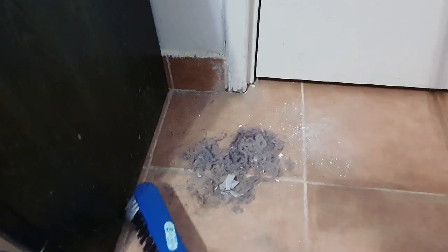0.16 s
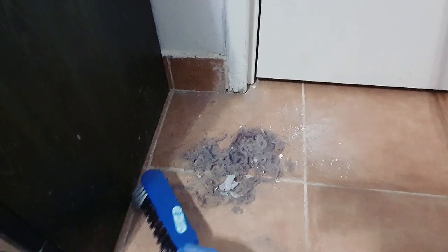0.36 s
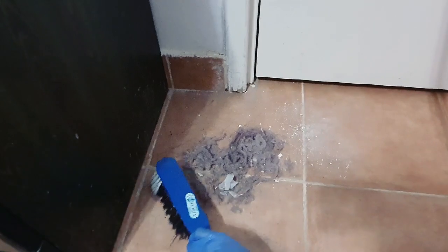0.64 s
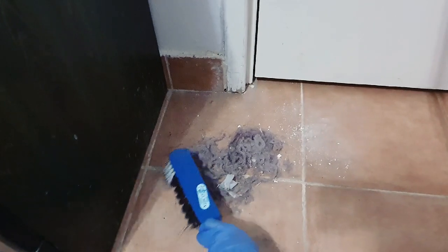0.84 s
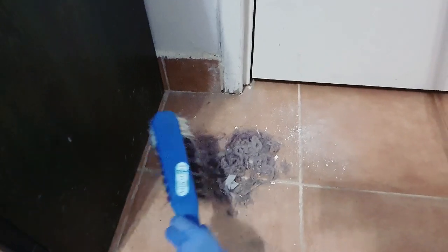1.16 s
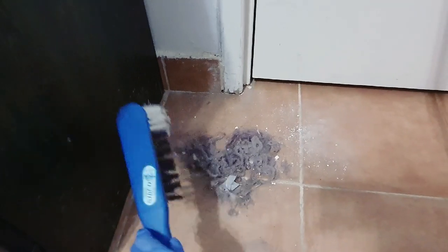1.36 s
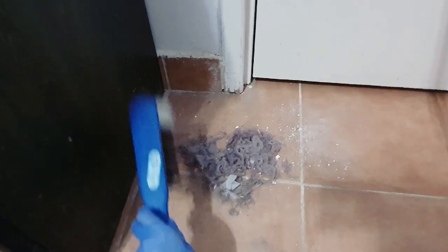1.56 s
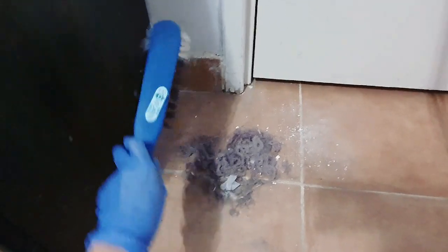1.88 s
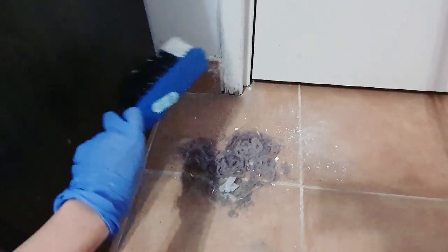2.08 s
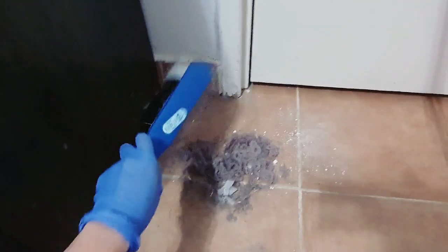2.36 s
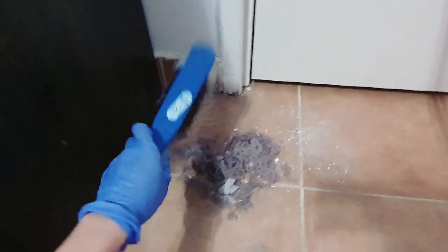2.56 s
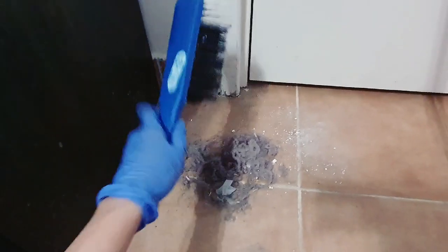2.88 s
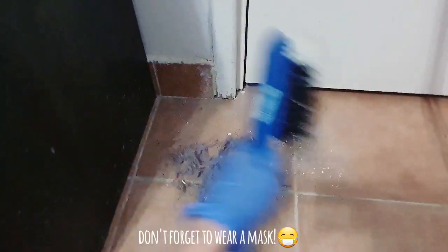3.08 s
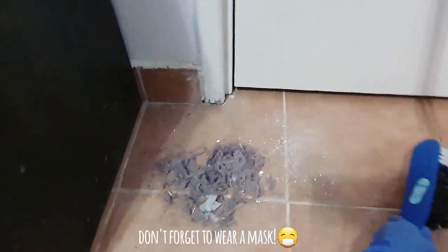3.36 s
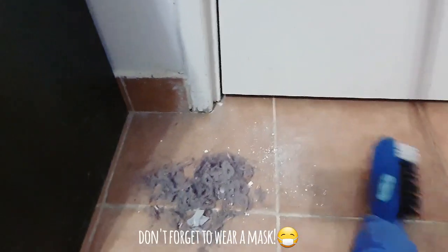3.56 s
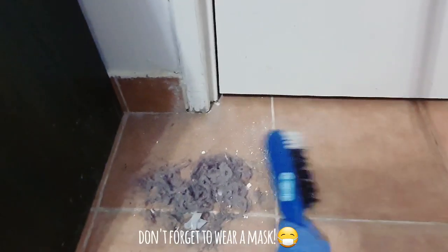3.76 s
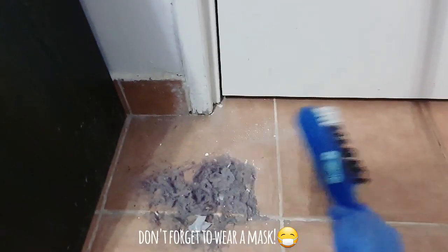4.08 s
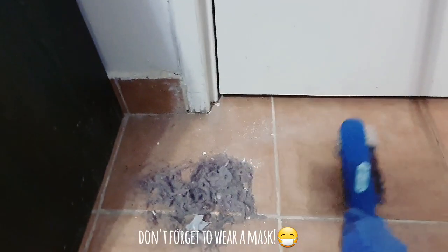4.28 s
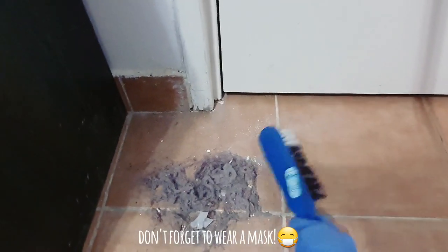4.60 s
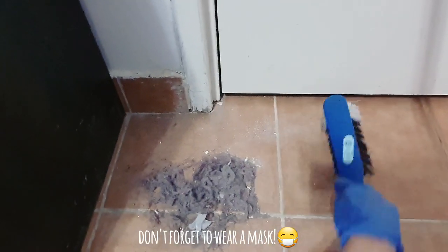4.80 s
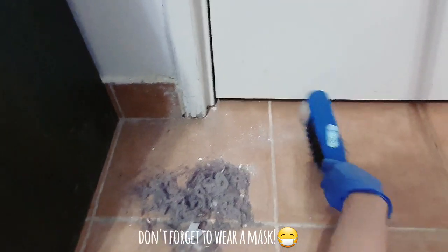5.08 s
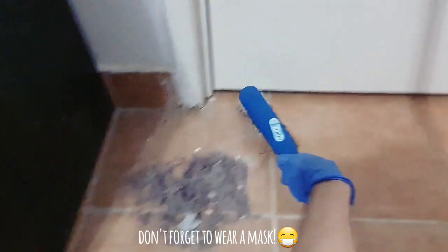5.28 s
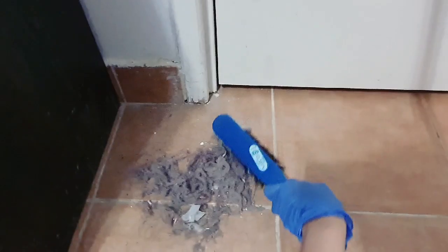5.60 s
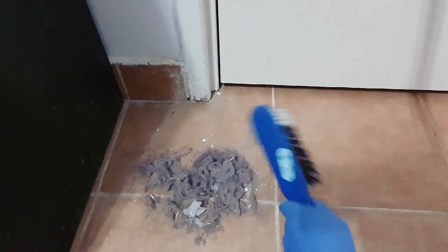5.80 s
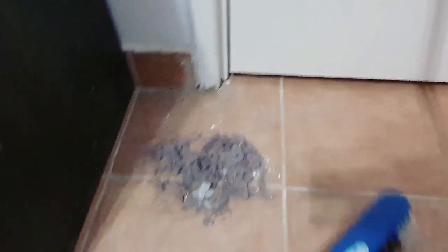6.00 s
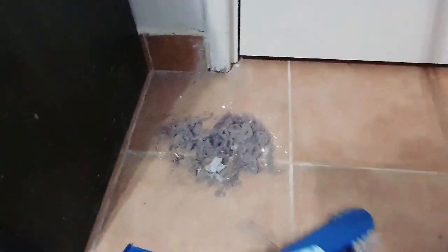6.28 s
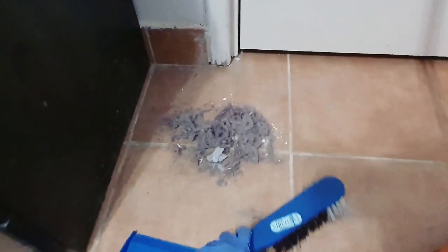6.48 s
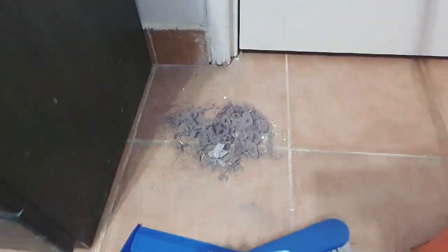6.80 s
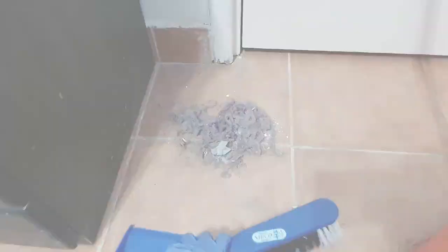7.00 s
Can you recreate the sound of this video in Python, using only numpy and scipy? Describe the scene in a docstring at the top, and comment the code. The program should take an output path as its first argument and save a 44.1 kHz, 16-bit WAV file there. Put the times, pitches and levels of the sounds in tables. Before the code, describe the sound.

Close-up floor sweeping indoors: gentle bristle rustles first, then slapping landings, plastic knocks and strong dry scrapes on tile, with occasional grit ticks. A final brush stroke gives way to a plastic dustpan rattling, scraping and ringing dully. Beneath it all, a motor's low rumble swells and sinks with airy hiss. The small hard room adds brief reflections.

```python
"""An appliance hums and hisses throughout in a small tiled room, its rumble swelling and sinking.
From the start a stiff hand brush sweeps dust over floor tiles: clouds of stick-slip clicks make its strokes
and dabs, bristles land as short crunches, and its knocks are damped modes struck by a firm contact and a
brief chatter. After a long sweep and a last stroke, a plastic dustpan bumps and scrapes into place, its tray
ringing. Bits of grit tick, plastic rubs as resonant noise, and close echoes and a short tail place it all."""
import sys
import numpy as np
from scipy import signal
from scipy.fft import rfft, irfft
from scipy.io import wavfile
from scipy.ndimage import uniform_filter1d

SR = 44100
rng = np.random.default_rng(int(sys.argv[2]) if len(sys.argv) > 2 else 0)


def waveform_to_disk(signal):
    """Save audio, clipped to [-1, 1], as 16-bit WAV at the path in sys.argv[1]."""
    frames = np.transpose(np.atleast_2d(signal))
    scaled = np.clip(frames, -1, 1) * 32767
    samples = np.round(scaled).astype(np.int16)
    wavfile.write(sys.argv[1], SR, samples)


N = 315182
T = np.arange(N) / SR  # s
HZ = np.fft.rfftfreq(N, 1 / SR)
EDGE_HZ = 14600  # upper band limit
EASE_DB_PER_S = 30  # the hand bears down as a stroke begins, then eases off

# Levels in the tables are taken before the trims in the functions and before the room.
# short brush strokes: start_s, attack_s, hold_s, release_s (per 20 dB), drag_db, swell_db (over the hold),
# tips_db (fizz against the drag), press_db (pressure against the drag)
STROKES = [(-0.05, .03, .37, .25, -75, -1, -6.5, -2), (0.42, .08, .13, .085, -75.5, 10.5, -8, -14),
           (1.19, .03, 1.25, .1, -84.5, -1.5, -9.5, -10), (2.54, .05, .06, .17, -65, 0, -9, -12),
           (3.19, .16, .25, .088, -55, 2.2, -4.3, 0), (4.03, .13, .12, .085, -56.3, -2.5, -4, -6),
           (5.85, .11, .15, .2, -63, .7, -9, 5.5)]
# one long sweep along the door: time_s, drag_db, fizz_db
LONG_SWEEP = [(4.745, -71, -76), (4.855, -56, -61), (4.947, -60, -61), (5.039, -65, -67), (5.205, -66, -68),
              (5.329, -63, -67), (5.471, -71, -80), (5.557, -76, -78), (5.62, -83, -88)]
# dabs of the bristles, and the brushing tail after a landing:
# peak_s, drag_db, rise_s (per 20 dB), fall_s (per 20 dB)
DABS = [(1.235, -75.5, .04, .2), (1.41, -83, .1, .15), (1.535, -81, .05, .15), (1.71, -76, .1, .19),
        (2.005, -78, .09, .04), (2.068, -74, .06, .11), (2.195, -75.5, .04, .22), (2.437, -75, .05, .12),
        (3.19, -58, .095, .13), (3.96, -73, .17, .16), (4.66, -60, .05, .18), (5.735, -67.5, .2, .14),
        (5.83, -67, .08, .15)]
# friction colour of the bristles: freq_hz, density_db (per Hz)
BRISTLE_COLOUR = [(100, -59), (300, -23.5), (800, -9.5), (1500, -4.5), (2400, -0.5), (3600, 1), (5000, 0),
                  (6500, -1.5), (8400, -3.5), (10000, -10.5), (14500, -24.5)]
# fizz of the bristle tips, also of dust under the pan: freq_hz, density_db (per Hz)
TIP_COLOUR = [(3000, -48), (7000, -16), (8800, -6), (10500, -5.5), (12300, -5.5), (14500, -9.5)]
# ringing of lightly touched tufts: freq_hz, width_hz, level_db
TUFT_MODES = [(4020, 420, 0), (4550, 500, -2.5), (8500, 990, -4)]
# ringing of the plastic brush back: freq_hz, width_hz, level_db
BRUSH_MODES = [(560, 154, 1), (925, 90, -0.5), (1185, 143, 1.5), (1394, 70, 2), (1573, 87, 1),
               (2000, 120, -0.5), (2300, 90, 0.5), (2776, 210, 1), (3452, 120, -4), (3660, 190, -4.5),
               (4320, 140, -2.5), (4750, 300, -9.5)]
# bristles slapping down: start_s, level_db, rise_s, fall_s, tips_db (fizz against the crunch)
LANDINGS = [(2.582, -52.5, 0.0075, 0.012, -9), (3.159, -44, 0.015, 0.017, -6),
            (4.041, -50, 0.0052, 0.02, -9), (4.632, -49.5, .003, 0.03, -13), (5.871, -58, .002, .012, -20)]
# knocks of the brush on tile, tufts twanging or the plastic back ringing:
# start_s, level_db, centre_hz, spread_octaves, chatter_s
KNOCKS = [(1.222, -69, 4200, .25, .012), (2.589, -52.5, 4100, 0.25, 0.012), (3.168, -45, 3600, 1.6, 0.012),
          (4.0435, -40.5, 1750, 1.1, 0.006), (4.633, -43, 2800, 0.53, 0.0057),
          (5.869, -47.5, 2700, 0.35, 0.006), (5.898, -52.5, 1400, 1.8, .005)]
# dustpan sliding into place: time_s, scrape_db (its lip), tray_db (its ring), dust_db (fizz underneath)
SLIDE = [(6.38, -92, -86, -110), (6.46, -68, -68, -100), (6.64, -66.5, -66, -100),
         (6.73, -56.5, -61.5, -73), (6.8, -61.5, -64, -84), (6.88, -66, -67, -85), (6.97, -65, -69, -80),
         (7.1, -71, -82, -100)]
# friction colour of the dustpan lip: freq_hz, density_db (per Hz)
SCRAPE_COLOUR = [(400, -31), (1500, -4), (2800, 7), (4000, -5), (5200, -1.5), (6500, -5.5), (8500, -4.5),
                 (10000, -10), (12000, -11.5), (14500, -28)]
# ringing of the dustpan: freq_hz, width_hz, level_db
PAN_MODES = [(402, 120, 0), (790, 180, -3.5), (1070, 190, -1.5), (1660, 120, 1.5), (2280, 91, 0),
             (2850, 210, -2.5), (3850, 750, -10)]
# dustpan bumps: start_s, level_db, centre_hz, spread_octaves, chatter_s
BUMPS = [(6.437, -60, 2200, 1.5, .004), (6.467, -54, 1400, 0.8, .01), (6.514, -58, 1600, 1, 0.012),
         (6.547, -50, 1700, .9, 0.018), (6.595, -56, 2200, 0.49, .004), (6.682, -57, 3520, 0.9, .004),
         (6.728, -53, 2850, 1.4, .012), (6.755, -48.5, 397, 0.45, 0.012), (6.802, -54.5, 2200, 0.85, 0.005)]
# plastic rubbing on tile, dull scuffs to faint squeaks: start_s, length_s, centre_hz,
# width_hz (of the resonance before it is squared), level_db
RUBS = [(0.199, .28, 1370, 900, -68.5), (5.24, 0.1, 2850, 400, -63), (5.843, 0.031, 2730, 200, -60),
        (6.388, 0.075, 1080, 700, -66)]
# grit ticking under the bristles and the dustpan: start_s, level_db
GRIT = [(2.723, -62), (5.743, -63), (5.7695, -48), (6.659, -58), (7.044, -62), (7.055, -59)]
# deep rumble of the appliance: freq_hz, density_db (per Hz)
RUMBLE_COLOUR = [(20, -22), (38, -14), (50, -3), (60, 0), (76, 4), (84, 15), (90, 10), (98, 2.5),
                 (110, -14), (160, -49.5), (400, -120)]
# swell of the rumble: time_s, level_db
RUMBLE_SWELL = [(0, -48.5), (.35, -43.5), (.9, -49), (1.7, -45), (2.7, -45), (3.4, -41.5), (4.5, -43.5),
                (5.4, -41), (6.1, -42.5), (6.7, -52), (7.15, -55)]
# rushing air of the appliance: freq_hz, density_db (per Hz)
RUSH_COLOUR = [(20, -34), (70, -22), (105, 8), (125, 11), (170, 8.5), (220, 0.5), (320, 0), (430, -3.5),
               (540, -9), (680, -13), (850, -25), (1500, -59), (4000, -100)]
# hiss of its pipes: freq_hz, density_db (per Hz)
HISS_COLOUR = [(500, -21), (850, -5.5), (1150, 0.5), (1420, -4), (1780, 0), (2050, -5), (2450, 0.5),
               (2900, -5), (3300, -15), (4500, -21.5), (9000, -25), (14500, -32)]
# fuzzy whistles of its pipes: centre_hz, width_hz (of the resonance before it is squared), level_db
WHISTLES = [(1765, 170, -84.5), (2760, 105, -75.5)]
# tones of its motor: pitch_hz, level_db, unsteadiness (0-1)
MOTOR_TONES = [(58.2, -56, 0.35), (70.86, -46.5, 0.39), (361.2, -64.5, 0.13), (494.5, -79, 0.7),
               (605, -85, 1)]
# first echoes from floor, door, wall and cabinet: left_delay_s, right_delay_s
ECHOES = [(.00083, .00088), (.0019, .0022), (.0037, .0033), (.0058, .0064)]
# decay of the room: freq_hz, t60_s
ROOM_DECAY = [(250, 0.38), (1000, 0.43), (4000, 0.14), (8000, 0.21), (14000, 0.1)]
# left-right likeness of the sounds: freq_hz, likeness (0-1)
LIKENESS = [(30, 0.93), (125, 0.95), (250, 0.98), (500, 0.43), (1000, 0.18), (2500, 0.17), (5000, 0.12),
            (14000, 0.092)]
# stereo balance: freq_hz, left_over_right_db
LEAN = [(60, -1.5), (250, -0.7), (500, -0.9), (1000, -3.8), (2000, -3.5), (4000, -2.5), (8000, -1.1),
        (12000, 1.2)]


def sweeping(press_db=-4.0, fizz_db=3.5, catch_db=-0.7, tuft_db=-9.5, damped_db=-65.0):
    """Thousands of bristles catch and flick on the tile; pressure from the hand shakes the brush back."""
    moves = [stroke(*row) for row in STROKES] + [dab(*row) for row in DABS] + [long_sweep()]
    drag, fizz, press = np.sqrt(sum(move ** 2 for move in moves))
    twang = np.minimum(drag, amp(damped_db)) * amp(tuft_db)  # a firm stroke damps the tufts
    flicks = slips(7000, 1.7) * amp(catch_db * wander(60))  # whole tufts catch together
    bristles = drag * colour(flicks, amp(read(BRISTLE_COLOUR, HZ)))
    tufts = twang * colour(slips(1500, 2.5), body(TUFT_MODES, HZ))
    back = amp(press_db) * press * colour(slips(3000, 1.6), body(BRUSH_MODES, HZ))
    tips = amp(fizz_db) * fizz * colour(slips(9000, 1.6), amp(read(TIP_COLOUR, HZ)))
    return bristles + tufts + back + tips


def stroke(start, attack, hold, release, db, swell_db, tips_db, press_db):
    """The brush gathers speed, is drawn along and lifts off: gains of drag, fizz and pressure."""
    t = T - start - attack
    onset = np.clip(1 + t / attack, 0, 1)
    swell = swell_db * np.clip(t / hold, 0, 1)
    lift = 20 * np.maximum(t - hold, 0) / release
    drag = onset * amp(db + swell - lift)
    return np.array([drag, drag * amp(tips_db), drag * amp(press_db) * bearing(start)])


def long_sweep(drag_db=4., tips_db=2.5, press_db=6.5):
    """A hard push that trails off along the door: gains of drag, fizz and pressure."""
    s, db, fizz_db = np.transpose(LONG_SWEEP)
    drag = level(s, db + drag_db)
    return np.array([drag, level(s, fizz_db + tips_db), drag * amp(press_db) * bearing(s[0])])


def dab(s, db, rise, fall, tips_db=-14.5, press_db=-3.):
    """The bristles brush against the tile and fade: gains of drag, fizz and pressure."""
    drag = amp(db - 20 * np.maximum((s - T) / rise, (T - s) / fall))
    return np.array([drag, drag * amp(tips_db), drag * amp(press_db)])


def bearing(start):
    """The share of the hand's pressure that is left as a stroke goes on."""
    return amp(-EASE_DB_PER_S * np.maximum(T - start, 0))


def landings():
    """Rows of bristles meet the floor within a few milliseconds: a short crunch."""
    crunch, fizz = np.zeros((2, N))
    for s, db, rise, fall, tips_db in LANDINGS:
        onset = np.clip((T - s) / rise, 0, 1)
        gain = amp(db) * onset * np.exp(-np.maximum(T - s - rise, 0) / fall)
        crunch += gain
        fizz += gain * amp(tips_db)
    bristles = colour(slips(10000, 0.67), amp(read(BRISTLE_COLOUR, HZ)))
    tips = colour(slips(12000, 1.8), amp(read(TIP_COLOUR, HZ)))
    return crunch * bristles + fizz * tips


def blows(rows, modes, rattle=.12, size=4096):
    """Each blow is one firm contact and a brief chatter that ring the modes in a band around its centre."""
    out, t, hz = np.zeros((2, N)), np.arange(size) / SR, np.fft.rfftfreq(size, 1 / SR)
    for s, db, centre_hz, octaves, chatter in rows:
        force = rattle * rng.standard_normal((2, size)) * np.exp(-t / chatter)
        force[0] += np.arange(size) == SR // 1000  # the firm contact, 1 ms in
        band = 1 / (1 + 1j * (hz / centre_hz - centre_hz / (hz + 1)) / octaves)
        ring = colour(force, body(modes, hz) * band)
        loudest = uniform_filter1d((ring ** 2).mean(0), size=256).max()  # power over about 6 ms
        add(out, s, amp(db) * ring / np.sqrt(loudest))
    return out


def sliding(tray_db=-1.5, judder_db=2.):
    """The lip of the dustpan judders over the dusty tile and rings its tray."""
    s, *levels_db = np.transpose(SLIDE)
    scrape, tray, dust = (amp(np.interp(T, s, db, left=-140)) for db in levels_db)
    grains = slips(4000, 2.8) * amp(judder_db * wander(70))
    lip = scrape * colour(grains, amp(read(SCRAPE_COLOUR, HZ)))
    ring = amp(tray_db) * tray * colour(grains, body(PAN_MODES, HZ))
    return lip + ring + dust * colour(grains, amp(read(TIP_COLOUR, HZ)))


def rubs():
    """Friction noise through one squared resonance, swelling and fading as the plastic passes."""
    out, hz = np.zeros((2, N)), np.fft.rfftfreq(SR, 1 / SR)
    for s, length, centre_hz, width, db in RUBS:
        size = int(length * SR)
        tone = colour(rng.standard_normal((2, SR)), body([(centre_hz, width, 0)], hz) ** 2)
        add(out, s, amp(db) * unit(tone[:, :size]) * signal.windows.tukey(size, .5))
    return out


def grit(ping_hz=6300, fall=0.00042, snap=0.16, size=256):
    """A grain of grit gives one tiny bright tick: a fast-fading ping with a snap of noise."""
    out, t = np.zeros((2, N)), np.arange(size) / SR
    for s, db in GRIT:
        tick = np.sin(2 * np.pi * ping_hz * t) + snap * np.diff(rng.standard_normal((2, size + 1)))
        add(out, s, 2 * amp(db) * tick * np.exp(-t / fall))
    return out


def appliance(rumble_db=-2.5, rush_db=-53.0, rush_share=0.35, hiss_db=-69., flutter_db=-0.5,
              gurgle_db=3.2, drone_share=.25):
    """A motor's wavering tones over low rumble and rushing air, with hiss and fuzzy whistles from its pipes."""
    s, db = np.transpose(RUMBLE_SWELL)
    low_db = np.interp(T, s, db)
    swell_db = low_db - low_db.mean()
    rumble = amp(low_db + rumble_db) * noise(amp(read(RUMBLE_COLOUR, HZ)))
    rush = amp(rush_db + rush_share * swell_db) * noise(amp(read(RUSH_COLOUR, HZ)))
    hiss = amp(hiss_db + flutter_db * wander(7.6)) * noise(amp(read(HISS_COLOUR, HZ)))
    whistles = sum(amp(db + gurgle_db * wander(12)) * noise(body([(hz, width, 0)], HZ) ** 2)
                   for hz, width, db in WHISTLES)
    hum = 0
    for hz, db, shake in MOTOR_TONES:
        waver = 1 + shake * (wander(5.7) + 1j * wander(8.1))  # moves both level and phase
        tone = (waver * np.exp(2j * np.pi * (hz * T + rng.random()))).real
        drone_db = drone_share * swell_db * (hz < 100)  # the deep tones swell with the rumble
        hum = hum + amp(db + drone_db) * np.sqrt(2) * tone
    return rumble + rush + hiss + whistles + hum


def corner(x, echo=.16):
    """Hard faces are close by: their first echoes comb the friction, differently at each ear."""
    comb = 1 + echo * sum(np.exp(-2j * np.pi * np.outer(delays, HZ)) for delays in ECHOES)
    return irfft(rfft(x) * comb, N) / np.sqrt(1 + len(ECHOES) * echo ** 2)


def room(x, wet_db=-5., size=22050):
    """Sparse echoes from tile and door, each band dying at its own speed."""
    struck = rng.random((2, size)) < 3000 / SR  # about 3000 echoes per second
    taps = rng.choice([-1., 1.], (2, size)) * struck * (np.arange(size) > .004 * SR)
    hz, t, z = signal.stft(taps, SR, nperseg=256)
    tail = signal.istft(z * amp(-60 * t / read(ROOM_DECAY, hz)[:, None]), SR, nperseg=256)[1]
    tail /= np.linalg.norm(tail, axis=1, keepdims=True)
    wet = signal.fftconvolve(x, tail, axes=1)[:, :N]
    return (x + amp(wet_db) * wet) / np.hypot(1, amp(wet_db))


def slips(per_s, spread_db):
    """Tiny stick-slip clicks at random moments, a few of them large."""
    size = amp(spread_db * np.minimum(rng.exponential(1, (2, N)), 4))
    return size * rng.choice([-1, 1], (2, N)) * (rng.random((2, N)) < per_s / SR)


def body(modes, hz):
    """Response of a set of damped modes, alternating in sign."""
    return sum((-1) ** k * amp(db) * 1j * hz * width / (f * f - hz * hz + 1j * hz * width)
               for k, (f, width, db) in enumerate(modes))


def colour(pair, gain):
    """Shapes two unrelated signals into a left and right that are alike in the bass; rms 1."""
    hz = np.fft.rfftfreq(pair.shape[1], 1 / SR)
    a, b = rfft(pair)
    same = np.clip(read(LIKENESS, hz), 0, 1)
    mid, side = a * np.sqrt(1 + same), b * np.sqrt(1 - same)
    return unit(irfft(np.array([mid + side, mid - side]) * gain, pair.shape[1]))


def noise(gain):
    """Steady noise of rms 1 with the given spectrum."""
    return colour(rng.standard_normal((2, N)), gain)


def wander(rate_hz):
    """Slow random drift of rms 1: noise kept below about the given rate."""
    return unit(irfft(rfft(rng.standard_normal(N)) / (1 + (HZ / rate_hz) ** 4), N))


def level(s, db):
    """A gain curve through the given points, silent outside them."""
    return amp(np.interp(T, s, db, left=-140, right=-140))


def read(points, hz):
    """A table over frequency, joined on a log-frequency axis."""
    f, value = np.transpose(points)
    return np.interp(np.log(hz + 1), np.log(f + 1), value)


def amp(db):
    """Decibels to linear gain."""
    return 10 ** (np.asarray(db) / 20)


def unit(x):
    """Scales a sound to rms 1."""
    return x / np.sqrt(np.mean(x ** 2) + 1e-20)


def add(mix, s, sound):
    """Lays a sound into the mix at s seconds, cut at the end of the mix."""
    part = mix[:, round(s * SR):][:, :sound.shape[1]]
    part += sound[:, :part.shape[1]]


def scene():
    """Brush and dustpan in the room, over the appliance."""
    friction = corner(sweeping() + sliding(), echo=0.16) + rubs()
    hits = landings() + blows(KNOCKS, BRUSH_MODES) + blows(BUMPS, PAN_MODES) + grit()
    return room(friction, wet_db=-10.0) + room(hits, wet_db=-8.0) + appliance()


def record(dry):
    """Left and right microphones differ in balance by frequency; a steep low-pass then limits the band."""
    lean = amp(read(LEAN, HZ) * np.array([[.5], [-.5]]))
    heard = irfft(rfft(dry) * lean, N)
    low_pass = signal.firwin(511, EDGE_HZ, window=("kaiser", 9), fs=SR)
    return signal.oaconvolve(heard, low_pass[None], "same")


dry = scene()
out = record(dry)
waveform_to_disk(out)
```